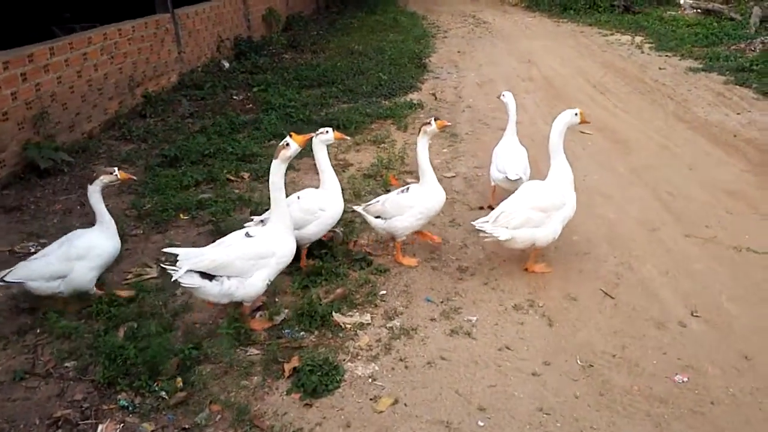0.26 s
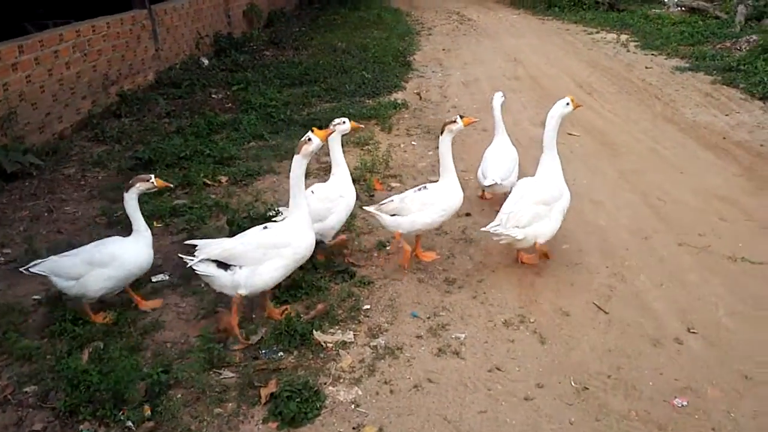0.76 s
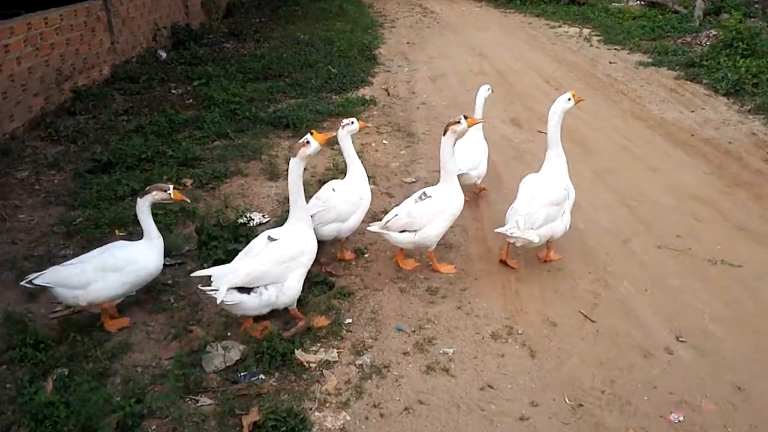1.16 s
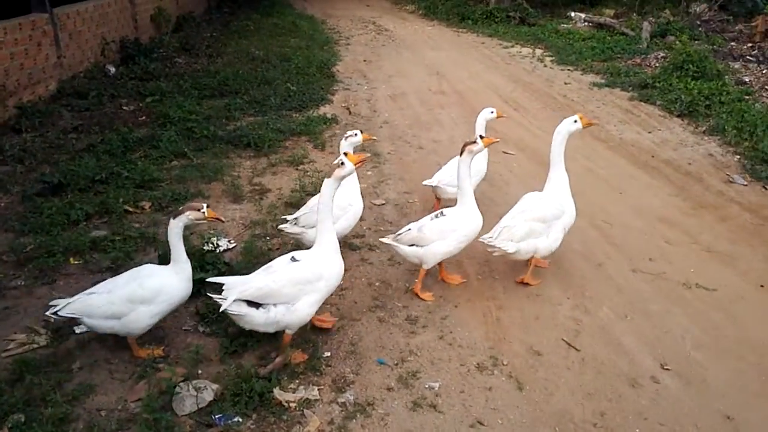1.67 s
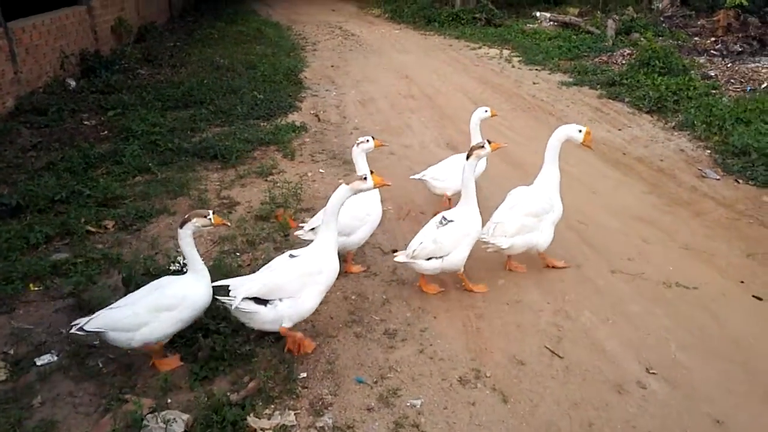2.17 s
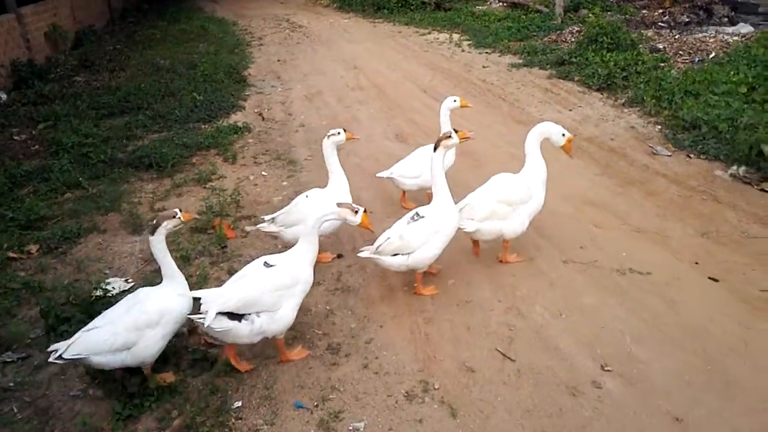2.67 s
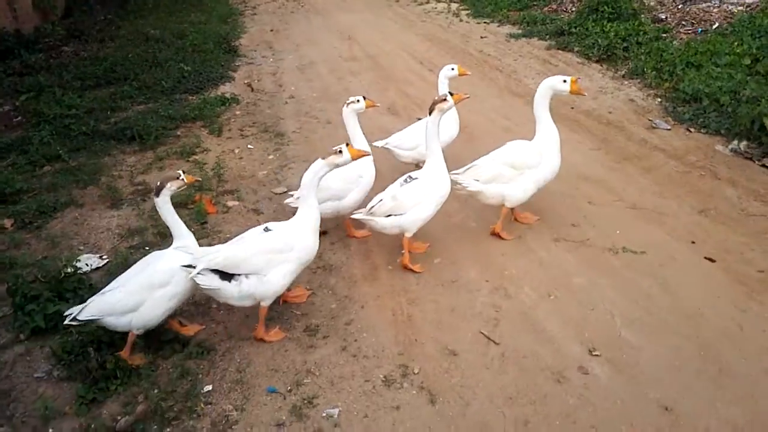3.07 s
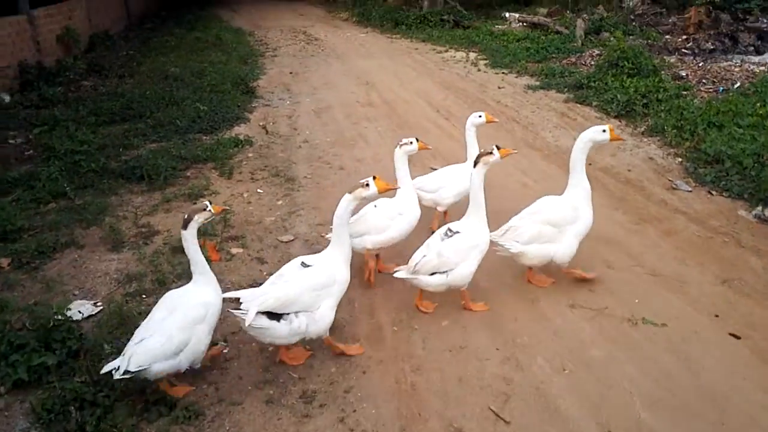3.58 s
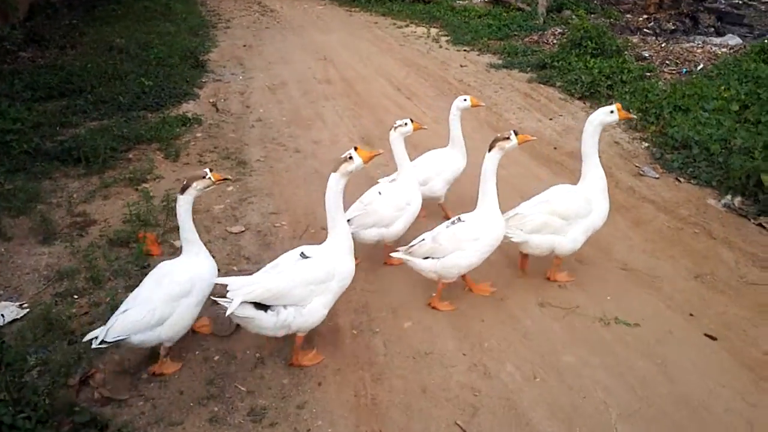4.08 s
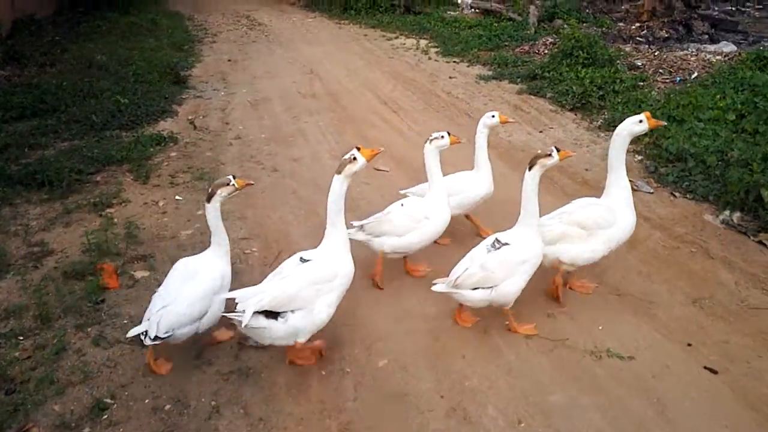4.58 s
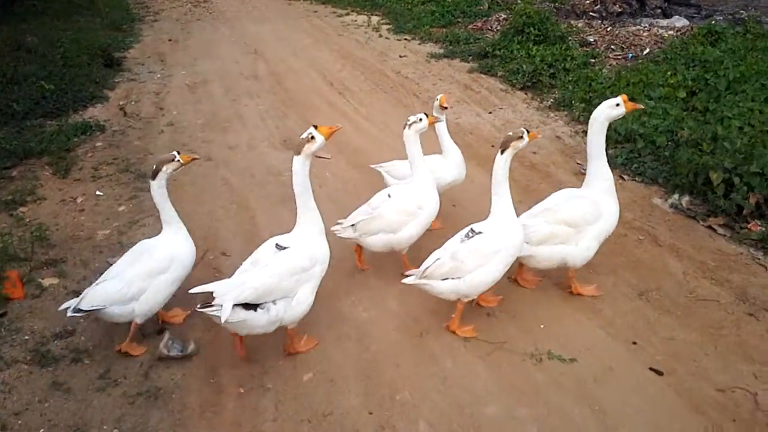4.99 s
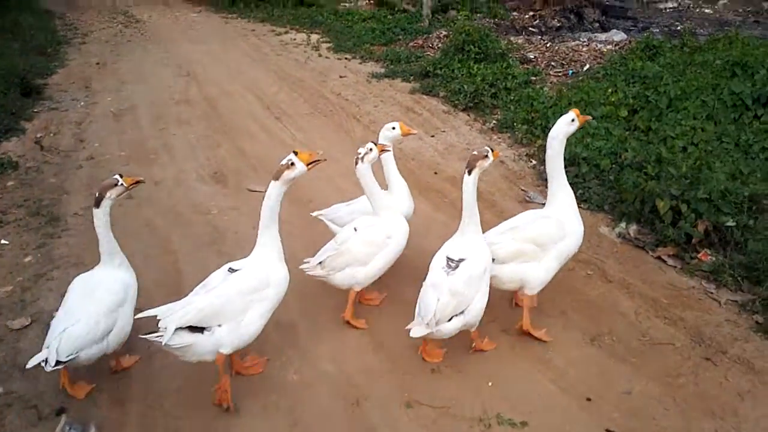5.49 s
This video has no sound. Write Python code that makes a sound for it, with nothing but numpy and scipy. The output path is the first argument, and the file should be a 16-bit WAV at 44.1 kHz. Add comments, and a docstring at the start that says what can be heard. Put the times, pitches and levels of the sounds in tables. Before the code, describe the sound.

Raspy goose honks and thin squeals come in short bouts a few metres away, over faint outdoor hiss and light scuffing steps.

```python
"""A dirt path by a brick wall: domestic geese walk past a few metres away, honking in bouts.
Two membranes of the syrinx beat against each other in a rasping honk; locked, they give a clear note.
Steps scuff the grit, something clicks near the microphone and the camera body takes two soft bumps.
The wall returns a faint echo; outdoor hiss and low rumble lie underneath."""
import sys
import numpy as np
from scipy import signal
from scipy.fft import rfft, irfft, next_fast_len
from scipy.io import wavfile

SR = 44100
rng = np.random.default_rng(int(sys.argv[2]) if len(sys.argv) > 2 else 0)


def transcribe(u):
    """Save the signal u as a 16-bit wav file named by the first command-line argument.

    u: samples, shape (n,) or (channels, n), limited to [-1, 1]; the rate is SR.
    q: integer samples, one column per channel.
    """
    v = np.clip(np.atleast_2d(u).T, -1, 1)
    q = np.round(v * 32767).astype(np.int16)
    wavfile.write(sys.argv[1], SR, q)


N = 253134

# throat resonances shared out among the voices: f/Hz, level/dB
HARSH_TIGHT = [(680, -11), (1030, -6.5), (1520, -2), (2050, -6), (2830, -19.5), (3750, -8), (5050, -12.5),
               (7100, -22)]
HARSH_OPEN = [(680, -11), (1080, -2.5), (1420, 0), (2030, -15.5), (2800, -14.5), (3450, -11), (3950, -17.5),
              (4850, -15.5)]
BRASSY_TIGHT = [(630, -7), (1070, -4), (1730, -2.5), (2330, -20), (3520, -10.5), (4550, -15.5), (6800, -20)]
BRASSY_OPEN = [(600, -10), (1080, 0), (1520, -5.5), (2830, -15), (3420, -9), (4450, -16.5), (6750, -24.5)]
NASAL_TIGHT = [(500, -4.5), (1280, 2), (1590, 4), (3100, -8), (3480, -5)]
NASAL_OPEN = [(520, -1.5), (980, 3), (1320, 4), (1780, -4), (3100, -7), (3480, -3)]
SOFT = [(690, -5), (1000, 0), (1450, 3), (2030, -8), (3200, -14.5), (3580, -13), (4150, -18.5)]
HOARSE = [(600, -7), (1000, -2.5), (1380, 0.5), (3350, -7), (4600, -6.5), (6200, -11), (8600, -17.5)]
# clear-note spectra: level/dB of harmonics 1, 2, 3...
TRUMPET_TONE = [-5, 0.5, -2, -13, -20, -15.5, -5, -15, -12, -9.5, -15, -11, -14, -16, -21, -21, -6, -6.5,
                -14, -19, -18.5, -17, -25, -39, -30, -25]
WHINE_TONE = [-3, 0.5, -19, -22, -21.5, -22]
YELP_TONE = [-1, 2.5, -12, -15]
SQUEAL_TONE = [0, -26]


def geese():
    """Rasping honks and the clear notes they break into."""
    # voice, t/s, length/s, attack/s, release/s, pitch crest/s, top pitch/Hz, its climb/Hz,
    # top beat/Hz, its climb/Hz, top level/dB, its swell/dB, chest/dB, rasp/dB, its change/dB, sing share
    honks = [("harsh", 1.334, 0.42, 0.031, 0.065, 0.29, 716, 42, 168, 3.995, -30.2, 3.8, -12.5, -5.8, -1.7, 0.08),
             ("soft", 1.755, 0.35, 0.038, 0.105, 0.33, 731, 48, 300, 22, -29.8, 4, -17.5, -18, 4.5, 0.6),
             ("hoarse", 2.465, 0.07, 0.03, 0.036, 0.05, 750, 9.8, 150, 4.1, -58, 3, -13, 4, 0, 0.01),
             ("nasal", 2.505, 0.46, 0.041, 0.11, 0.33, 676, 66, 169, 30, -42, 2, -9, -15, 5, 0.011),
             ("nasal", 3.4, 0.193, 0.043, 0.069, 0.149, 620, 5.9, 150, 10.1, -71, 2.3, 0, 12.5, 0, 0.01),
             ("hoarse", 3.61, 0.15, 0.028, 0.08, 0.149, 625, 20, 148, 5, -47, 11.7, 2.2, -1.5, 0, 0.05),
             ("brassy", 3.736, 0.42, 0.03, 0.08, 0.35, 692, 70, 170, 24, -29.7, 3.5, -12.3, -7, 0, 0.36),
             ("hoarse", 4.7, 0.28, 0.016, 0.038, 0.29, 660, 60, 154, 45, -39.5, 13, -9, -6, 7.6, 0.17),
             ("hoarse", 5.13, 0.08, 0.036, 0.06, 0.06, 622, 4, 147, 7.95, -41, 4.6, -3, 2, -3.5, 0.05),
             ("brassy", 5.22, 0.4, 0.031, 0.12, 0.28, 676, 52, 163, 17, -28.8, 2.9, -13.5, -8.5, 0.68, 0.24),
             ("soft", 5.57, 0.18, 0.065, 0.08, 0.18, 708, 18, 330, 11.9, -27.3, 3.3, -17, -16.5, 0, 0.4)]
    # tone, t/s, length/s, mid pitch/Hz, glide/Hz, arch/Hz, level/dB, swell/dB
    notes = [("squeal", 0.61, 0.069, 763, -55, 36, -47, 0), ("squeal", 1.675, 0.112, 1425, 70, 4, -30, 0),
             ("whine", 2.11, 0.49, 759, 28, 2.96, -45.3, 5.5),
             ("yelp", 2.145, 0.1, 698, -200, 40.6, -44.5, -14),
             ("yelp", 2.47, 0.109, 742, 10.5, 42.3, -47.5, 2.7),
             ("squeal", 2.655, 0.05, 1610, 11, 4.3, -42, -7),
             ("squeal", 2.735, 0.056, 1660, 15, 3.6, -41.5, 0),
             ("moan", 2.955, 0.09, 590, -130, -8, -50, -6),
             ("moan", 3.605, 0.23, 628, -10, -10, -43.5, 4.7),
             ("trumpet", 4.945, 0.25, 485.5, 6, -9, -36.5, -0.62),
             ("squeal", 5.147, 0.064, 1363, 8.8, 42, -24.5, 0),
             ("squeal", 5.275, 0.13, 1405, 65, -20, -26.5, 4.5)]
    mix = np.zeros(N)
    for kind, start_s, *settings in honks:
        add(mix, start_s, honk(kind, *settings))
    for kind, start_s, *settings in notes:
        add(mix, start_s, clear_note(kind, *settings))
    return mix


def honk(kind, length_s, attack_s, release_s, crest_s, top_hz, climb_hz, top_beat_hz, beat_climb_hz,
         top_db, swell_db, chest_db, rasp_db, rasp_change_db, sing_share):
    """One membrane buzzes; its beat with the other bends the pitch and chops it into claps."""
    # per voice: tight throat, open throat, opening time/s, arch power, sway/rad, clap depth, throb/dB
    voices = {"harsh": (HARSH_TIGHT, HARSH_OPEN, 0.15, 1.6, 2.1, 0.47, 0),
              "brassy": (BRASSY_TIGHT, BRASSY_OPEN, .14, 2.1, 2.22, 0.5, 0),
              "hoarse": (BRASSY_OPEN, HOARSE, .17, 1.3, 2.4, 0.56, 0),
              "soft": (SOFT, SOFT, .25, 1.05, 0.54, 0.4, 0),
              "nasal": (NASAL_TIGHT, NASAL_OPEN, .33, 1.9, 1.54, 0.38, 2.1)}
    # per voice: depth of jitter and noise
    roughness = {"harsh": .15, "brassy": .12, "hoarse": .28, "soft": .25, "nasal": .18}
    tight, opened, open_s, arch_power, sway_rad, clap_depth, throb_db = voices[kind]
    rough = roughness[kind]
    bill_open_s, sing_hz, throb_hz, release_db = 0.042, 1030, 13.24, -26.5
    t = np.arange(0, length_s + release_s, 1 / SR)
    # rising pressure lifts pitch and level; both sag as the air runs out
    along = np.minimum(t / length_s, 1)
    spent = np.maximum(t - length_s, 0) / release_s
    slack = abs(1 - t / crest_s) ** arch_power
    sag = 1 - 0.0596 * spent
    pitch_hz = (top_hz - climb_hz * slack) * sag
    beat_hz = (top_beat_hz - beat_climb_hz * slack) * sag
    drop_db = release_db * spent ** 1.5 - swell_db * (1 - along ** 0.76)

    buzz_rad = phase(pitch_hz * (1 + 0.00329 * wander(t, 43.3)))
    beat_rad = phase(beat_hz)
    shaky_rad = beat_rad + rough * wander(t, 70)
    swing_rad = buzz_rad + sway_rad * np.sin(shaky_rad) + .5 * rough * wander(t, 300)
    claps = np.exp(clap_depth * np.cos(shaky_rad + 0.72) + rough * wander(t, 166))
    buzz = unit_rms(sum(np.cos(k * swing_rad + (k > 1) * 2 * np.pi * rng.random()) for k in range(1, 14)))
    flutter = colour(rng.standard_normal(len(t)), lambda f: 1 + below(f, 3200))
    voice = throat(claps * (buzz + 1.6 * rough * flutter), tight, opened, open_s)

    chest = unit_rms(colour(voice, lambda f: below(f, 737) * (1 - below(f, 507))))
    cry = unit_rms(colour(voice, lambda f: below(f, 2484) - below(f, 920)))
    rasp = colour(voice, lambda f: below(f, 11800) - below(f, 2610))
    rasp = unit_rms(rasp * gain_of(1.4 * wander(t, 70)))
    # an upper sideband falls on a throat resonance and sings out
    order = round((sing_hz - top_hz) / top_beat_hz)
    sideband = unit_rms(np.sin(buzz_rad + order * beat_rad + rough * wander(t, 94)))
    share = np.clip(sing_share * along ** 0.66, 0, .9)
    sound = np.sqrt(1 - share) * cry + np.sqrt(share) * sideband
    sound += gain_of(chest_db - .4 * drop_db) * chest  # follows only 60 % of a level drop
    bill_opening = np.minimum(t / bill_open_s, 1)
    sound += gain_of(rasp_db + rasp_change_db * along ** 1.9) * bill_opening * rasp
    sound += gain_of(-20) * np.sin(shaky_rad) * below(beat_hz, 173)
    level_db = top_db + drop_db + throb_db * np.cos(2 * np.pi * throb_hz * (t - .03))
    return np.minimum(t / attack_s, 1) * gain_of(level_db) * sound * signal.windows.tukey(len(t), .02)


def throat(drive, tight, opened, open_s):
    """The throat's resonances cross-fade from tight to open around open_s."""
    hz, t, spectra = signal.stft(drive, SR, nperseg=512, noverlap=384)
    tightness = 1 / (1 + (t / open_s) ** 10)
    gain = gain_of(tightness * throat_db(tight, hz) + (1 - tightness) * throat_db(opened, hz))
    return signal.istft(spectra * gain, SR, nperseg=512, noverlap=384)[1][:len(drive)]


def throat_db(peaks, hz):
    """Rounded resonances, wider toward the treble, over a dull floor."""
    # floor between resonances: f/Hz, level/dB
    valley = [(2500, -23.5), (6000, -26.5), (8000, -29), (13000, -42)]
    power = sum((gain_of(db) / (1 + ((hz - f) / (78 + .04 * f)) ** 2)) ** 2 for f, db in peaks)
    return 10 * np.log10(power + gain_of(read(valley, hz)) ** 2)[:, None]


def clear_note(kind, length_s, mid_hz, glide_hz, arch_hz, level_db, swell_db):
    """Locked membranes give one harmonic tone; pitch, level and brightness follow a leaning arch."""
    # per tone: harmonics/dB, level at the ends/dB, relative pitch jitter, shimmer/dB, end fraying/rad
    tones = {"trumpet": (TRUMPET_TONE, -3.4, 0.002, 0.59, .45),
             "whine": (WHINE_TONE, -2, 0.00607, 0.98, 0.5), "yelp": (YELP_TONE, -5.5, 0.019, 3.2, .2),
             "squeal": (SQUEAL_TONE, -10.5, 0.012, 1.4, 0), "moan": (SQUEAL_TONE, -5, 0.025, 2.4, 0)}
    harmonics_db, ends_db, jitter, shimmer_db, fray_rad = tones[kind]
    t = np.arange(0, length_s, 1 / SR)
    lean = t / length_s - .5
    ends = (2 * lean) ** 2
    pitch_hz = mid_hz + glide_hz * lean - arch_hz * ends
    effort_db = swell_db * lean + ends_db * ends
    swing_rad = phase(pitch_hz * (1 + jitter * wander(t, 82))) + fray_rad * ends ** 2 * wander(t, 310)
    tone = np.zeros(len(t))
    for k, harmonic_db in enumerate(harmonics_db, 1):
        octaves = np.log2(k)  # upper harmonics swell and drift more
        change_db = effort_db * (1 + 0.74 * octaves) + .8 * octaves * wander(t, 9)
        tone += gain_of(harmonic_db + change_db) * np.cos(k * swing_rad + 0.88 * rng.standard_normal())
    envelope = gain_of(level_db + shimmer_db * wander(t, 110)) * signal.windows.tukey(len(t), .2)
    return np.sqrt(2) * envelope * tone


def steps():
    """Each scuff on the grit is a rush of tiny slips that starts fast and dies away."""
    # scuffs: t/s, length/s, level/dB, tilt/(dB/octave)
    scuffs = [(0.487, 0.075, -43.5, 2), (0.969, 0.093, -50, 8), (2.335, 0.14, -52.5, 0),
              (3.396, 0.085, -52, 6.5), (3.52, 0.082, -53, 3), (4.15, 0.073, -42.5, -3),
              (4.403, 0.043, -52, -3), (4.471, 0.038, -40.5, -1.5), (4.524, 0.024, -37.5, -1),
              (4.572, 0.066, -42.5, 2)]
    # grit spectrum: f/Hz, level/dB
    grit = [(180, -29), (300, -19), (1230, -1), (1940, -11.5), (9220, -8), (14000, -24)]
    mix = np.zeros(N)
    for start_s, length_s, level_db, tilt_db in scuffs:
        t = np.arange(0, 2 * length_s, 1 / SR)
        slips = rng.standard_normal(len(t)) * np.exp(0.36 * wander(t, 450))
        envelope = np.minimum(t / (0.15 * length_s), 1) / (1 + (t / length_s) ** 5)
        add(mix, start_s, gain_of(level_db) * envelope * tilted(slips, grit, tilt_db))
    return mix


def clicks_and_bumps():
    """Sharp clicks near the microphone; soft, low bumps on the camera body."""
    # clicks: t/s, level/dB, t60/s, tilt/(dB/octave)
    clicks = [(2.831, -40, 0.012, 0), (3.233, -41.5, 0.0069, 7), (3.509, -39.5, 0.0079, 7),
              (4.444, -41.5, 0.017, -7), (4.476, -35.5, 0.017, -3), (4.5005, -19.5, 0.0082, 0),
              (4.703, -33, 0.012, -0.5)]
    # click spectrum: f/Hz, level/dB
    click_spectrum = [(250, -22), (1250, -2), (2000, -7), (5500, -2.5), (8000, -7.5), (14000, -19)]
    # bumps: centre t/s, f/Hz, level/dB
    bumps = [(1.889, 85, -42), (5.042, 102, -44.5)]
    mix, t = np.zeros(N), np.arange(4096) / SR
    for start_s, level_db, t60_s, tilt_db in clicks:
        crack = tilted(rng.standard_normal(len(t)), click_spectrum, tilt_db)
        add(mix, start_s, crack * gain_of(level_db - 60 * t / t60_s))
    for centre_s, hz, level_db in bumps:
        add(mix, centre_s - t[-1] / 2, gain_of(level_db) * np.sin(2 * np.pi * hz * t) * np.hanning(len(t)))
    return mix


def echo(x, t60_s):
    """Thin scatter from wall, ground and bushes."""
    t = np.arange(SR // 2) / SR
    taps = rng.standard_normal(len(t)) * (rng.random(len(t)) < .05)
    taps *= (t > .004) * gain_of(-60 * t / t60_s)
    return signal.oaconvolve(x, taps / np.linalg.norm(taps))[:N]


def outdoors():
    """Lumpy low rumble under a hiss that is louder at both ends."""
    # background spectrum: f/Hz, level/dB
    air_spectrum = [(12, -39), (20, -8.5), (54, -3), (270, -13), (508, -15.5), (745, -16), (809, -13),
                    (1440, -14), (5500, -18.5), (9030, -15), (14000, -35)]
    # hiss envelope: t/s, level/dB
    hiss_levels = [(0, -51), (1.2, -54.5), (1.35, -58), (4.35, -61), (4.7, -58.5), (5.74, -45)]
    t = np.arange(N) / SR
    air = colour(rng.standard_normal(N), lambda f: gain_of(read(air_spectrum, f)))
    rumble = colour(air, lambda f: below(f, 227))
    hiss_db = np.interp(t, *np.transpose(hiss_levels)) + .5 * wander(t, 8.7)
    hiss = unit_rms(air - rumble) * gain_of(hiss_db)
    return hiss + gain_of(-55.5) * unit_rms(rumble * gain_of(2.5 * wander(t, 13.5)))


def gain_of(db):
    return 10 ** (np.asarray(db) / 20)


def unit_rms(x):
    return x / np.sqrt(np.mean(x ** 2) + 1e-20)


def phase(hz):
    return 2 * np.pi * np.cumsum(hz) / SR


def read(points, hz):
    """Interpolates a spectrum over log frequency."""
    f, value = np.transpose(points)
    return np.interp(np.log(hz + 1), np.log(f + 1), value)


def add(mix, start_s, sound):
    part = mix[max(round(start_s * SR), 0):][:len(sound)]
    part += sound[:len(part)]


def colour(x, gain):
    """Filters x by gain(f/Hz)."""
    size = next_fast_len(len(x) + 2048)
    return irfft(rfft(x, size) * gain(np.fft.rfftfreq(size, 1 / SR)), size)[:len(x)]


def tilted(x, spectrum, tilt_db):
    """Filters x by a spectrum plus a treble tilt per octave; rms 1."""
    return unit_rms(colour(x, lambda f: gain_of(read(spectrum, f) + tilt_db * np.log2(f / 1000 + 0.3))))


def below(hz, edge_hz):
    """Steep low-pass gain."""
    return 1 / (1 + (hz / edge_hz) ** 10)


def wander(t, rate_hz):
    """Smooth noise, rms 1."""
    return unit_rms(colour(rng.standard_normal(len(t)), lambda f: np.exp(-(f / rate_hz) ** 2)))


def scene():
    """Sound reaches the left microphone port first; the right port is muffled."""
    # port balance: f/Hz, left minus right/dB
    port_balance = [(80, 1.6), (350, 2.5), (1400, 13.5), (5600, 23.5), (11000, 34.5)]
    hz, delay_s = np.fft.rfftfreq(N, 1 / SR), 0.000514
    near = geese() + steps() + clicks_and_bumps()
    sound = near + gain_of(-16) * echo(near, t60_s=.25) + outdoors()
    lag_rad = 2 * np.pi * hz * delay_s + 1.08 * (1 - below(hz, 173))
    shade = gain_of(-read(port_balance, hz)) * np.exp(-1j * lag_rad)
    left_spectrum = 2 * rfft(sound) / (1 + shade * below(hz, 3800))
    right = irfft(left_spectrum * shade, N) + gain_of(-40) * echo(near, t60_s=0.17)
    right += gain_of(-83) * rng.standard_normal(N)
    return np.array([irfft(left_spectrum, N), right])


def record(dry):
    """Band limit at 14.4 kHz."""
    return signal.oaconvolve(dry, signal.firwin(511, 14400, window=("kaiser", 9), fs=SR)[None], "same")


dry = scene()
out = record(dry)
transcribe(out)
```